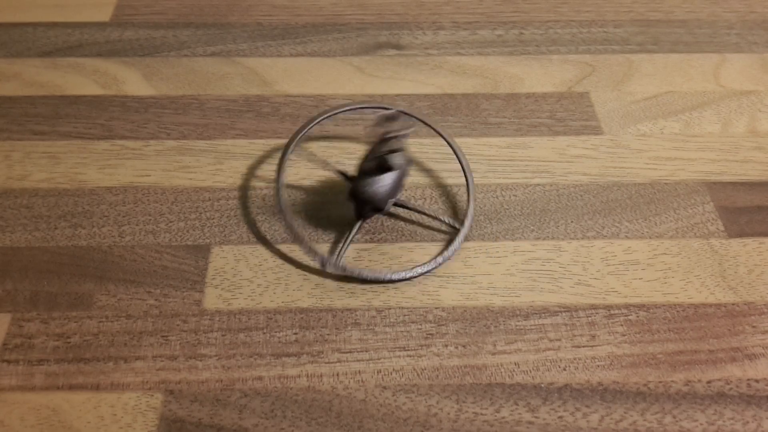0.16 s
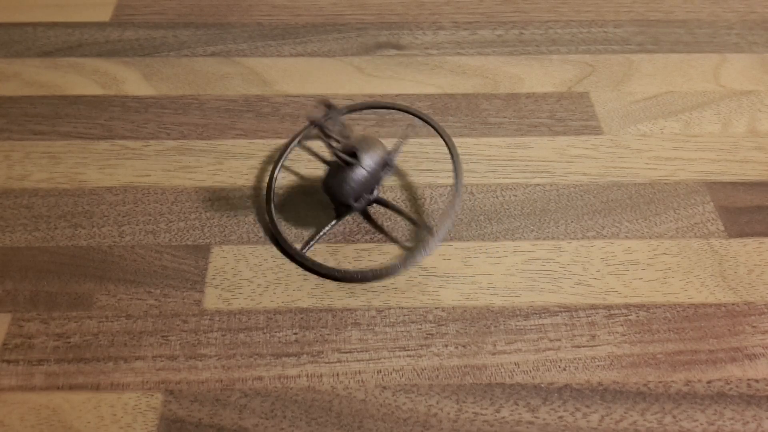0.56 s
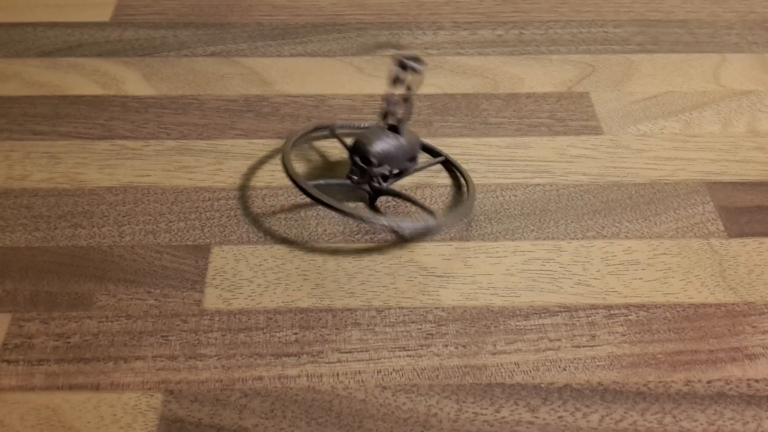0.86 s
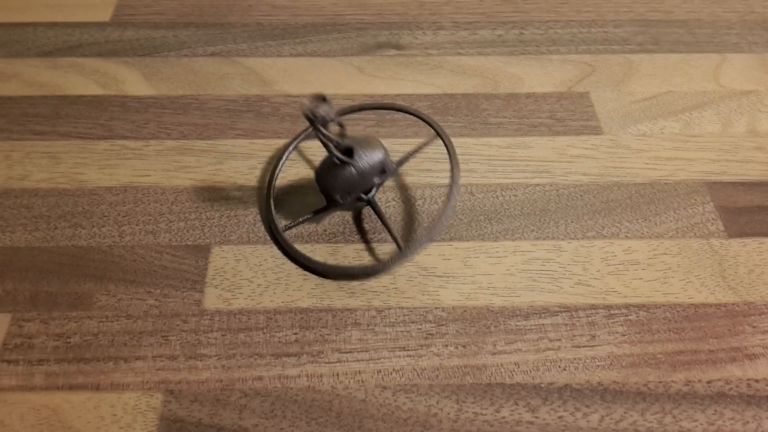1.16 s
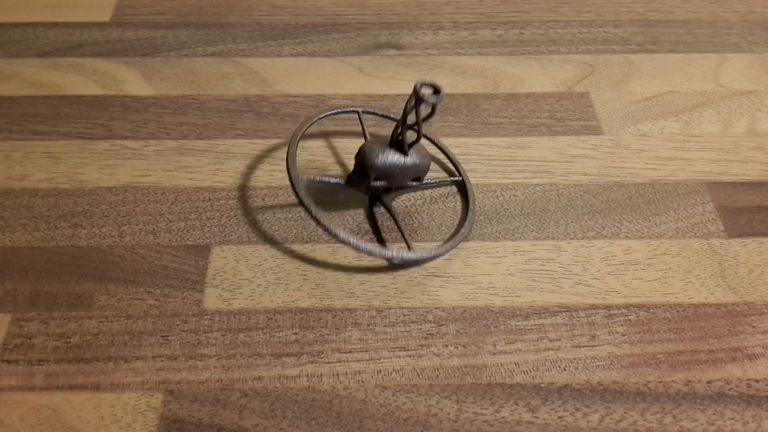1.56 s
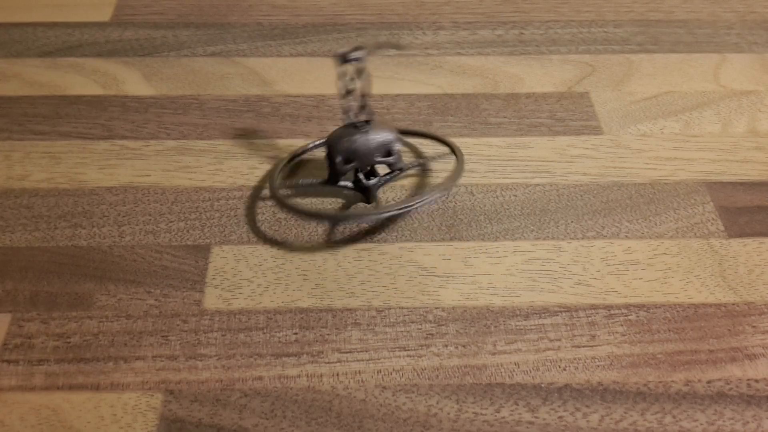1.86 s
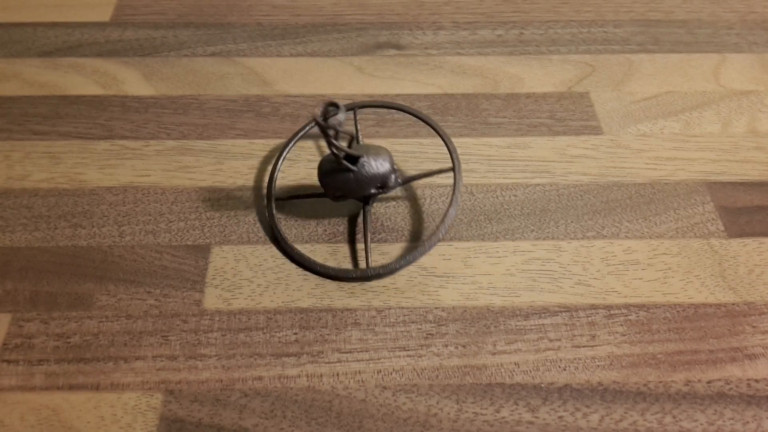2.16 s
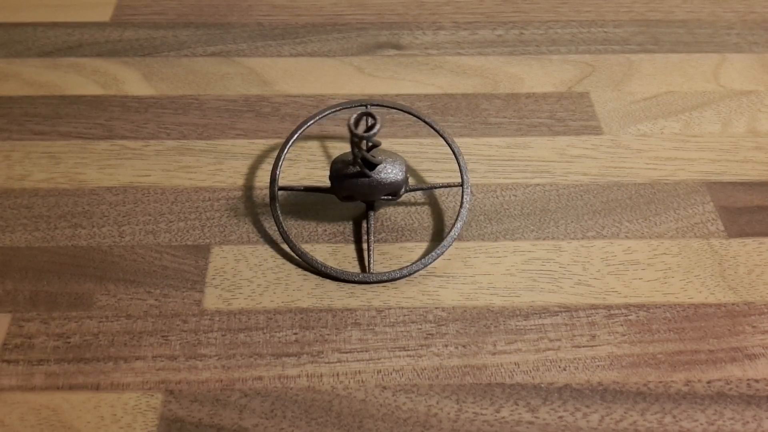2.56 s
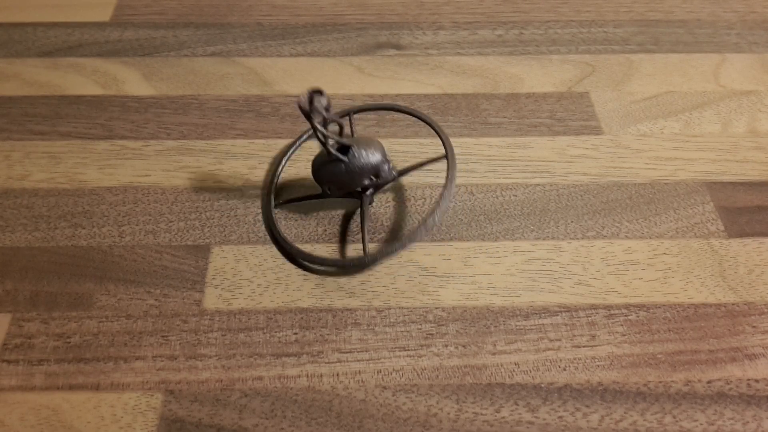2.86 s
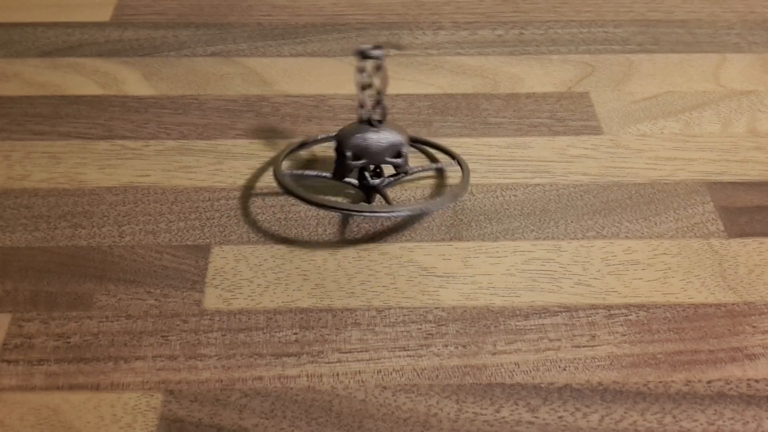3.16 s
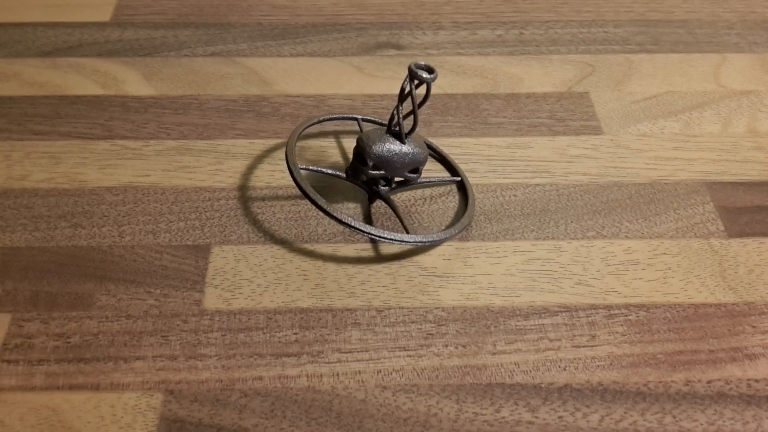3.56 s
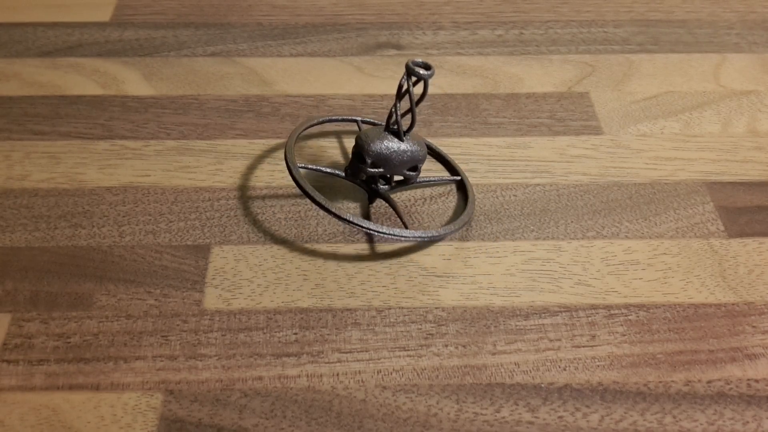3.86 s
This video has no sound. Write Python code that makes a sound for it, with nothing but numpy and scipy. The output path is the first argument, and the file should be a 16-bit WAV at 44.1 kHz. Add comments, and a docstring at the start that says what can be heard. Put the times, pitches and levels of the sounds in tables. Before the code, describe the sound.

A small metal top scrapes, ticks and rings harshly on a wooden board, then its rim rolls in separate, weakening swells with a hollow tone; close stereo microphone in a small quiet room.

```python
"""Metal spinning top wobbling on wood

A small top wobbles on a wooden worktop indoors, close by. At first its rim scrapes and strikes, and the
metal rings; then the rim only rolls, in swells that grow weaker. Random grain impacts shake filters for the
board, its grit and two low resonances of the top, which rise a little in pitch as it calms.
Wavering tones make the ringing, brief singing notes and a faint hum; filtered noise makes the room's air."""
import sys
import numpy as np
from scipy import signal
from scipy.fft import rfft, irfft
from scipy.io import wavfile

SR = 44100
rng = np.random.default_rng(int(sys.argv[2]) if len(sys.argv) > 2 else 0)


def unload_audio(sound):
    """Save the sound as a 16-bit wav file, at the path given as the first command line argument."""
    columns = np.transpose(np.atleast_2d(sound))
    # keep every value between -1 and 1, then stretch to whole-number steps
    steps = np.round(np.clip(columns, -1, 1) * 32767)
    wavfile.write(sys.argv[1], SR, steps.astype(np.int16))


N = 176400  # length in samples: 4 seconds

# All table levels are relative: the functions that use them may add a trim in dB.
# grit under the rim: (time [s], level [dB])
GRIT_LEVEL = [(0, -35.5), (.05, -38.5), (.08, -43), (.2, -42.5), (.27, -47.5), (.41, -58.5), (.47, -49),
              (.54, -62), (.6, -49), (.66, -62.5), (.72, -60), (.96, -74.5), (1.2, -66.5), (1.6, -83.5),
              (1.9, -88.5), (2.07, -76.5), (2.68, -99), (3.29, -85), (4, -99.5)]
# scraping of the rim: (time [s], level [dB])
SCRAPE_LEVEL = [(0, -41.5), (.046, -46), (.102, -49), (.2, -47.5), (.406, -76.5), (.576, -82), (.95, -104)]
FLUTTER_HZ = 59.5  # how often the contact changes strength
COARSE_PER_S = 1300  # average number of coarser grains per second


def undb(db):
    """Turn decibels into a gain."""
    return 10 ** (np.asarray(db) / 20)


def curve(rows):
    """Join (time [s], level [dB]) points with straight lines and return the gain."""
    return undb(np.interp(np.arange(N) / SR, *np.array(rows).T))


def walk(rate_hz):
    """Random wavering: straight lines between random values, rate_hz of them a second."""
    return np.interp(np.arange(N) * rate_hz / SR, np.arange(N), rng.standard_normal(N))


def tone(hz, drift_hz, waver_db, rate_hz):
    """A sine that wavers in pitch and level, with an rms near 1."""
    phase = 2 * np.pi * (rng.random() + np.cumsum(hz + drift_hz * walk(rate_hz)) / SR)
    return np.sqrt(2) * np.sin(phase) * undb(waver_db * walk(rate_hz))


def unit(response, band=None):
    """Scale a stereo response to unit energy, counted only within a band (Hz) if one is given."""
    size = response.shape[1]
    hz = np.arange(size // 2 + 1) * SR / size
    low, high = band or (0, SR)
    power = np.mean(abs(rfft(response)) ** 2, axis=0)
    energy = 2 * power[(hz >= low) & (hz <= high)].sum() / size
    return response / np.sqrt(energy)


def colour(rows, size=8192):
    """Stereo filter through (frequency [Hz], left [dB], right [dB]) points, reacting without delay."""
    hz, *sides = np.array(rows).T
    grid = np.log(np.maximum(np.arange(size // 2 + 1) * SR / size, 1))
    gains = undb([np.interp(grid, np.log(hz), side) for side in sides])
    # Folding the cepstrum gives minimum phase: the response starts at once, with no pre-echo.
    cepstrum = irfft(np.log(gains))
    cepstrum[:, 1:size // 2] *= 2
    cepstrum[:, size // 2 + 1:] = 0
    return irfft(np.exp(rfft(cepstrum)))


def modes(rows, size=32768):
    """Fading sines, one per (Hz, width Hz, left dB, right dB), a quarter cycle apart on the two sides."""
    t = np.arange(size) / SR
    response = np.zeros((2, size))
    for k, (hz, width, left, right) in enumerate(rows):
        # The right side leads and lags in turn.
        phase = np.array([[0], [(-1) ** k * np.pi / 2]])
        swing = np.exp(-np.pi * width * t) * np.sin(2 * np.pi * hz * t + phase)
        response += width * undb([[left], [right]]) * swing
    return response


def through(force, response):
    """Play a force through a stereo response."""
    return signal.fftconvolve(np.atleast_2d(force), response, axes=1)[:, :N]


def bandpass(sound, low_hz, high_hz):
    """Keep the part of a sound between two frequencies."""
    return signal.sosfilt(signal.butter(3, [low_hz, high_hz], "bandpass", fs=SR, output="sos"), sound)


def blows(rows, length_s):
    """One impulse for each (s, dB) row, with the energy of that level held for length_s."""
    force = np.zeros(N)
    for s, db in rows:
        force[int(np.clip(s * SR, 0, N - 1))] += undb(db) * np.sqrt(length_s * SR)
    return force


def bursts(rows, decay_s):
    """Envelope that adds a jump at each (s, dB) row, falling to 1 / e in decay_s."""
    t = np.arange(N) / SR
    return sum(undb(db) * (t >= s) * np.exp(-abs(t - s) / decay_s) for s, db in rows)


def reflect(sound, decay_s, wet_db):
    """Add diffuse reflections, unrelated left and right: they build up, then die by 1 / e in decay_s."""
    t = np.arange(SR // 2) / SR
    envelope = np.exp(-t / decay_s) * (1 - np.exp(-2 * t / decay_s))
    tail = rng.standard_normal((2, len(t))) * envelope
    return sound + undb(wet_db) * through(sound, unit(tail))


def grains(per_s=5000):
    """Tiny impacts of the rim on the grain of the wood, at random times and fluttering strength; rms 1."""
    spread_db, flutter_db = 2.5, 1.06
    hit = rng.random(N) < per_s / SR
    strength = undb(spread_db * np.minimum(rng.exponential(size=N), 3))
    force = hit * rng.choice([-1, 1], N) * strength * undb(flutter_db * walk(FLUTTER_HZ))
    return force / force.std()


def spread(contact):
    """The contact as the two sides hear it: partly alike, partly separate grains on each side."""
    direct_share = 0.63  # share of the energy that is alike
    scattered = np.array([grains(), grains()])
    return np.sqrt(direct_share) * contact + np.sqrt(1 - direct_share) * scattered


def hops():
    """The rim hops at random: each landing briefly presses it harder on the wood; rms 1."""
    per_s, fade_s, hop_db, spread_db = 110, .002, -3, 2.6
    strength = undb(hop_db + spread_db * np.clip(rng.standard_normal(N), -2, 2))
    landings = (rng.random(N) < per_s / SR) * strength
    pressure = 1 + signal.lfilter([1], [1, -np.exp(-1 / (fade_s * SR))], landings)
    return pressure / np.sqrt(np.mean(pressure ** 2))


def room_tone():
    """Steady air is filtered noise, partly shared by both sides; an appliance's hum is wavering tones."""
    # colour of the quiet room's air: (frequency [Hz], left [dB], right [dB])
    air_colour = [(26.4, -19, -21.5), (48, 3, 7.5), (65, -6, -10.5), (113, 0.5, 0.5), (155, -6, -2.5),
                  (278, -6.5, -2.5), (476, -14, -5.5), (780.3, -27, -14), (1280, -20.5, -13.5),
                  (1920, -29, -27.5), (4000, -37.5, -35), (8000, -38.5, -49), (9300, -39.5, -40.5),
                  (13940, -35, -34.5), (16600, -44.5, -46)]
    # hum of an appliance: (frequency [Hz], left [dB], right [dB])
    hum_partials = [(118.7, -78, -74.5), (1184, -96, -86.5)]
    air_db, shared = -71, 0.73  # shared: amplitude of the common noise beside each side's own
    noise = rng.standard_normal((3, N))
    noise = (noise[:2] + shared * noise[2]) / np.hypot(1, shared)
    air = undb(air_db) * through(noise, unit(colour(air_colour)))
    hum = np.zeros((2, N))
    for hz, left, right in hum_partials:
        hum += undb([[left], [right]]) * tone(hz, drift_hz=1.3, waver_db=2, rate_hz=34)
    return air + hum


def singing():
    """The juddering rim briefly locks onto one resonance: a tone swells and dies, later on the right."""
    # notes of the board or the top:
    # (middle [s], length [s], frequency [Hz], left [dB], right [dB])
    notes = [(0.18, 0.042, 333, -37, -43), (.19, 0.036, 510, -38, -45), (0.24, 0.067, 207, -43.5, -62),
             (.245, .065, 1277, -41.5, -42.5), (0.2785, 0.023, 562, -36, -48),
             (.645, 0.058, 477, -40.5, -52), (1.298, 0.021, 1327, -50, -46.5),
             (2.18, .035, 1347, -64, -58.5), (0.347, 0.025, 4850, -74, -59.5),
             (0.757, .035, 4900, -89, -68)]
    drift_share, waver_db, waver_hz = .008, 1.5, 151.5
    t = np.arange(N) / SR
    out = np.zeros((2, N))
    for s, length, hz, left, right in notes:
        swell = np.exp(-2 * ((t - s) / length) ** 2)
        note = swell * tone(hz, hz * drift_share, waver_db, waver_hz)
        quarter_cycle = int(SR / hz / 4)
        out += undb([[left], [right]]) * np.array([note, np.roll(note, quarter_cycle)])
    return out


def ringing():
    """Each mode of the metal stores the energy of the contact and lets it die away, wavering at random."""
    # pitches of the metal's ringing modes: (frequency [Hz])
    ring_hz = [7947, 8495, 8765, 9395, 10456, 11299, 11650, 14270, 14767, 15620]
    # how each of them rings: (time to fall by 60 dB [s], left [dB], right [dB])
    ring_modes = [(0.32, -23, -9.5), (0.24, -17, -5), (0.22, -18.5, -3.5), (.3, -19.5, 2), (.4, -23, -7),
                  (.3, -18, -20), (.3, -19.5, -24.5), (.22, -17.5, -25), (.2, -12, -21.5),
                  (.22, -27, -26.5)]
    grit_db, waver_db, waver_hz, drift_hz = -27, 4.5, 25.6, 1.8
    power = curve(SCRAPE_LEVEL) ** 2 + (undb(grit_db) * curve(GRIT_LEVEL)) ** 2
    out = np.zeros((2, N))
    for hz, (t60, left, right) in zip(ring_hz, ring_modes):
        keep = np.exp(-2 * np.log(1000) / (t60 * SR))  # energy kept from one sample to the next
        # The metal already holds some energy at the start.
        energy, _ = signal.lfilter([1 - keep], [1, -keep], power, zi=[power[0] / 2])
        out += undb([[left], [right]]) * np.sqrt(energy) * tone(hz, drift_hz, waver_db, waver_hz)
    return out


def scraping(pressure):
    """The rim skids over the grain, with a rasp and a hiss, and strikes the wood in sharp ticks."""
    # fine hiss of the contact: (time [s], level [dB])
    hiss_level = [(0, -40.5), (.09, -54), (.17, -69), (.22, -64), (.33, -73.5), (.59, -68), (.95, -85),
                  (1.33, -81), (1.6, -94.5), (2.17, -90.5), (2.7, -101), (3.28, -91.5), (3.7, -100)]
    # strikes of the rim on the wood: (time [s], strength [dB])
    tick_rows = [(.013, -30), (.037, -28.5), (.047, -23.5), (.0945, -35), (.1025, -35.5), (.113, -37),
                 (.1235, -39), (.1805, -35), (.202, -41), (.577, -54)]
    # colours of the scrape and the hiss: (frequency [Hz], left [dB], right [dB])
    scrape_colour = [(2480, -22, -7.5), (4000, -14.5, 1), (5340, -12.5, 3), (6000, -9.5, 7),
                     (6600, -12.5, -4), (7800, -10.5, 4), (8985, -5.5, 11.5), (11100, -10, -0.5),
                     (12300, -7, -12.5), (14980, -14, -25.5)]
    hiss_colour = [(4000, -23, -8), (7800, -19.5, -12), (8300, -7, 0.5), (9100, -6, 12.5),
                   (10150, -0.5, 3.5), (12300, -1, -2.5), (14310, -2, -6), (14700, -21, -26.5)]
    scrape_db, hiss_db, tick_db = -4, -4, -8.5
    scrape_filter = colour(scrape_colour)
    hiss_filter = unit(colour(hiss_colour), band=(9600, 14000))
    scrape_force = spread(grains()) * pressure * curve(SCRAPE_LEVEL)
    rasp = undb(scrape_db) * through(scrape_force, unit(scrape_filter, band=(5400, 7600)))
    hiss = undb(hiss_db) * through(spread(grains()) * curve(hiss_level), hiss_filter)
    strikes = undb(tick_db) * blows(tick_rows, length_s=0.0004)
    ticks = through(strikes, hiss_filter + unit(scrape_filter))
    return rasp + hiss + reflect(ticks, decay_s=0.0021, wet_db=2)


def grit_and_frame(pressure, crunches):
    """Coarser grains grind under the rim and rattle small resonances of the frame."""
    # colour of the grinding: (frequency [Hz], left [dB], right [dB])
    grit_colour = [(880, -21, -28), (1470, 0.5, 3.5), (1830, -9.5, -2.5), (2400, 0, 9), (2790, -1.5, 5),
                   (3290, -10, 1), (4013, -18, -10), (4830, -21, -14), (6500, -33, -28), (12025, -40, -44)]
    # small resonances of the frame: (frequency [Hz], width [Hz], left [dB], right [dB])
    frame_modes = [(1785, 71, -1.5, -4.5), (2130, 50, -3, 1), (2300, 63, -2.5, 1.5), (2740, 120, 0, 2),
                   (3110, 49, -5, 0.5), (4840, 60, -13.5, -5.5)]
    grit_db, frame_db, frame_flutter_db = -7, -3, 3
    rough = undb(grit_db) * (pressure * curve(GRIT_LEVEL) + crunches)
    grit_filter = unit(colour(grit_colour), band=(1800, 3500))
    grit = through(spread(grains(COARSE_PER_S)) * rough, grit_filter)
    flutter = undb(frame_db + frame_flutter_db * walk(FLUTTER_HZ))
    rattle = spread(grains(COARSE_PER_S)) * rough * flutter
    frame = bandpass(through(rattle, unit(modes(frame_modes))), 1400, 5600)
    return grit + frame


def board_modes(force, rows, band):
    """Modes of the board, each swelling and fading by itself as the moving contact favours it or not."""
    shift_db, shift_hz = 2.5, 18
    whole = modes(rows)
    scale = unit(whole, band).std() / whole.std()
    out = np.zeros((2, N))
    for row in rows:
        share = undb(shift_db * walk(shift_hz))
        share = share / np.sqrt(np.mean(share ** 2))
        out += through(force * share, modes([row]))
    return scale * out


def board(contact, pressure, bumps, crunches):
    """The grain, bumps and crunches shake the board, which rumbles, resonates and knocks."""
    # rumble of the board, then its low knocking: (time [s], level [dB])
    rumble_level = [(0, -46), (.24, -47.5), (.36, -61.5), (.48, -52.5), (.58, -59.5), (.62, -49.5),
                    (.66, -57.5), (.8, -62), (.93, -70.5), (1.16, -62), (1.4, -65), (1.52, -75.5),
                    (1.85, -78), (2.06, -68), (2.3, -75.5), (2.66, -88.5), (3, -84.5), (3.3, -74),
                    (3.6, -85.5), (4, -92.5)]
    knocking_level = [(0, -42), (.1, -53.5), (.18, -55.5), (.3, -55), (.54, -60.5), (.66, -54),
                      (.88, -67.5), (1.29, -65.5), (1.68, -76), (2.12, -70.5), (2.63, -85), (3.33, -72),
                      (3.7, -88)]
    # colour of the rumble: (frequency [Hz], left [dB], right [dB])
    wood_colour = [(29.9, -31.5, -32), (90, -22, -17), (170, -22, -21.5), (342, -5.5, -4.5),
                   (600, -3.5, -4), (920, -8, 1.5), (1160, -13, -11.5), (1380, -7, -8), (1730, -27, -10),
                   (2937, -35.5, -34.5)]
    # middle and low modes of the board: (frequency [Hz], width [Hz], left [dB], right [dB])
    middle_modes = [(480.4, 59, 6.5, 2), (628, 30, 2, -7.5), (707.5, 73, -3.5, -6.5), (837, 50, 1, 0.5),
                    (1034.3, 38, 1, 3), (1217, 36, -1, 3), (1437, 50, -18.5, -9)]
    low_modes = [(210, 22, -7, -10), (280, 32, -6, -15), (331.5, 24, -5, -6)]
    rumble_db, middle_db, knock_db, bump_db, crunch_db = -8.5, -3, 1, -12, -2
    wood_band = (700, 1150)  # Hz
    rumble = curve(rumble_level)
    shaking = pressure * rumble + undb(bump_db) * bumps + undb(crunch_db) * crunches
    wood = undb(rumble_db) * through(spread(grains()) * shaking, unit(colour(wood_colour), wood_band))
    wood += undb(middle_db) * board_modes(grains() * rumble, middle_modes, wood_band)
    knocking = spread(contact) * curve(knocking_level)
    wood += undb(knock_db) * board_modes(knocking, low_modes, band=(170, 400))
    return bandpass(wood, 100, 1900)


def top_mode(force, judder, wander_hz, hz, width, left_db, right_db):
    """A resonance of the top starts flat and recovers its pitch; juddering pushes it in step."""
    sag_share, sag_s, wander_rate_hz = 0.048, 0.8, 35.03
    t = np.arange(N) / SR
    # The pitch also shifts at random as the point of contact moves.
    pitch = hz * (1 - sag_share * np.exp(-t / sag_s)) + wander_hz * walk(wander_rate_hz)
    turn = np.exp(2j * np.pi * np.cumsum(pitch) / SR)
    pole, skirt = np.exp(-np.pi * width / SR), np.exp(-2 * np.pi * 2 * width / SR)
    # Shift the mode's pitch down to 0 Hz, smooth there, then shift back.
    push = np.sqrt(2 * (1 - pole ** 2)) * force / turn + np.pi * (1 - pole) * judder
    swing = signal.lfilter([1], [1, -pole], push)
    # A second smoothing weakens what lies far from the pitch.
    swing = turn * signal.lfilter([1 - skirt], [1, -skirt], swing)
    return np.array([undb(left_db) * swing.imag, undb(right_db) * swing.real])


def top_resonances(force, bumps):
    """The rolling contact shakes two resonances of the top; bumps push the lower one."""
    # strength of the lower and the upper resonance: (time [s], level [dB])
    lower_level = [(0, -40.5), (.28, -48.5), (.34, -51), (.48, -47.5), (.54, -56.5), (.6, -50),
                   (.72, -49.5), (.76, -75), (.82, -52.5), (.91, -68), (1.03, -52), (1.1, -57), (1.3, -58),
                   (1.55, -71), (1.7, -66.5), (1.9, -68), (2.15, -64.5), (2.42, -78.5), (2.52, -91.5),
                   (2.85, -85.5), (3.02, -79.5), (3.09, -65), (3.42, -77), (3.55, -85), (4, -88.5)]
    upper_level = [(0, -41.5), (.28, -46.5), (.32, -55), (.39, -55), (.46, -48), (.53, -65), (.62, -46),
                   (.73, -54.5), (.93, -72), (1, -58), (1.07, -77), (1.14, -57), (1.33, -66.5),
                   (1.55, -85.5), (1.77, -77), (1.9, -88.5), (2.07, -70.5), (2.45, -89.5), (3, -90),
                   (3.1, -72), (3.55, -96)]
    # the two resonances when calm: (frequency [Hz], width [Hz], left [dB], right [dB])
    lower_mode = (587, 65.5, 5.5, -6)
    upper_mode = (1343.5, 50.5, -1, 0)
    wander_hz = .03 * lower_mode[0]  # the same for both
    lower = top_mode(force * curve(lower_level), bumps, wander_hz, *lower_mode)
    upper = top_mode(force * curve(upper_level), 0, wander_hz, *upper_mode)
    return lower + upper


def rolling(pressure):
    """The rim rolls over grain, bumps and rough spots, shaking the top, the board and the grit."""
    # the rim judders over bumps: (time [s], strength [dB])
    bump_rows = [(.429, -44), (.462, -45.5), (.506, -45.5), (.593, -41.5), (.617, -50), (.726, -45.5),
                 (1.044, -51), (1.128, -47.5), (1.185, -59), (1.215, -48), (1.272, -52.5), (1.411, -57.5),
                 (1.733, -58.5), (1.806, -62), (1.826, -55.5), (1.936, -61.5), (1.968, -55), (2.010, -63),
                 (2.059, -53), (2.107, -58.5), (2.170, -55), (2.233, -69.5), (2.257, -64.5), (2.336, -65),
                 (2.425, -69), (2.878, -69), (2.982, -69.5), (3.030, -67), (3.078, -59), (3.130, -62.5),
                 (3.198, -61), (3.222, -61), (3.258, -56.5), (3.298, -64), (3.350, -58), (3.451, -67.5)]
    # the rim crunches over rough spots: (time [s], level [dB])
    crunch_rows = [(.013, -34), (.021, -46), (.037, -36), (.047, -35.5), (.095, -35.5), (.113, -36),
                   (.132, -39), (.181, -37), (.187, -46), (.201, -42), (.239, -35.5), (.264, -49),
                   (.456, -59), (.515, -59), (.55, -54), (.578, -51), (.673, -56), (.728, -49.5),
                   (1.065, -79), (1.131, -63), (1.187, -71), (1.968, -69), (2.010, -74), (2.060, -66.5)]
    bump_db = 1.5
    contact = grains()
    bumps = undb(bump_db) * bursts(bump_rows, decay_s=0.0059)
    crunches = bursts(crunch_rows, decay_s=.006)
    top = top_resonances(contact * pressure, bumps)
    wood = board(contact, pressure, bumps, crunches)
    return top + wood + grit_and_frame(pressure, crunches)


def scene():
    """The top on its board in a small room; only the rolling and the scraping get room reflections."""
    room_t60_s, room_db = .3, -6.5
    pressure = hops()
    contact_sound = rolling(pressure) + scraping(pressure)
    in_room = reflect(contact_sound, room_t60_s / np.log(1000), room_db)
    return room_tone() + singing() + ringing() + in_room


def record(dry):
    """A steep low-pass filter cuts the highest treble, above 15800 Hz."""
    return signal.sosfilt(signal.ellip(10, .2, 80, 15800, fs=SR, output="sos"), dry)


dry = scene()
out = record(dry)
unload_audio(out)
```